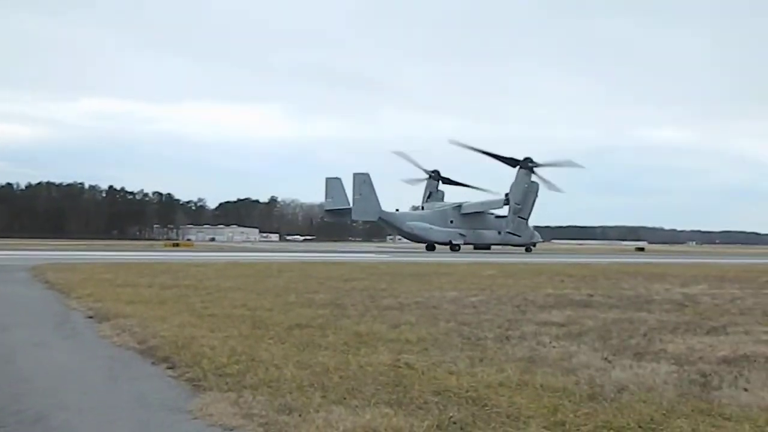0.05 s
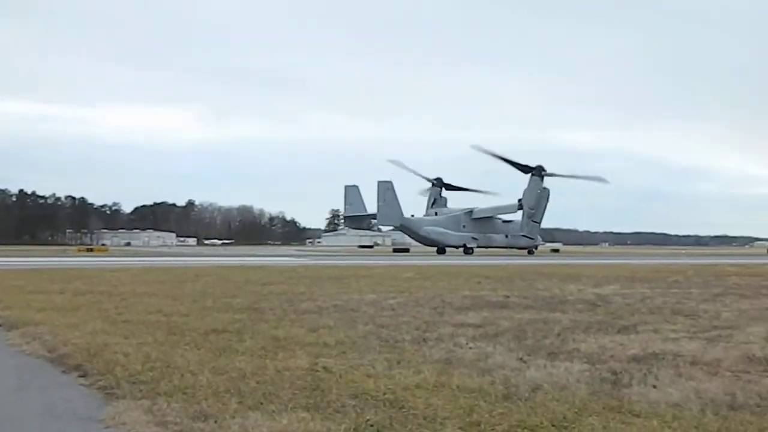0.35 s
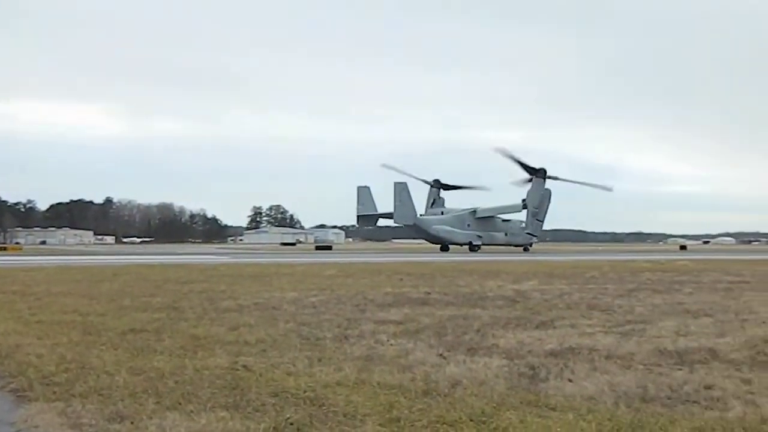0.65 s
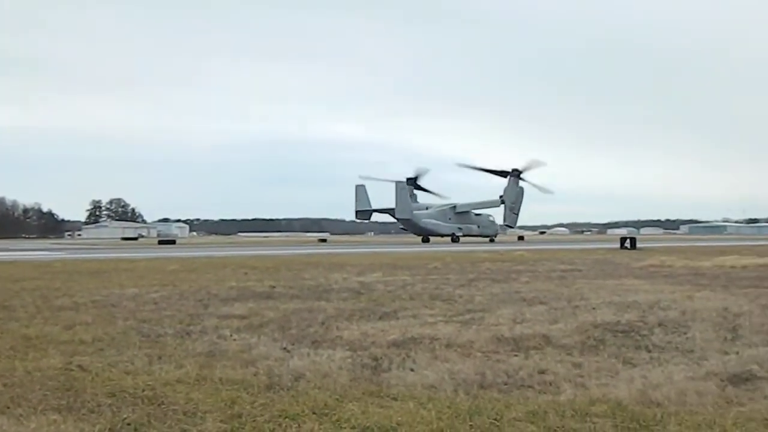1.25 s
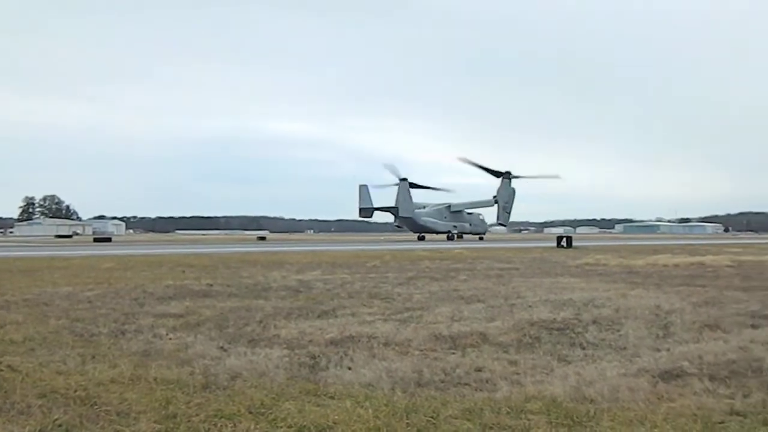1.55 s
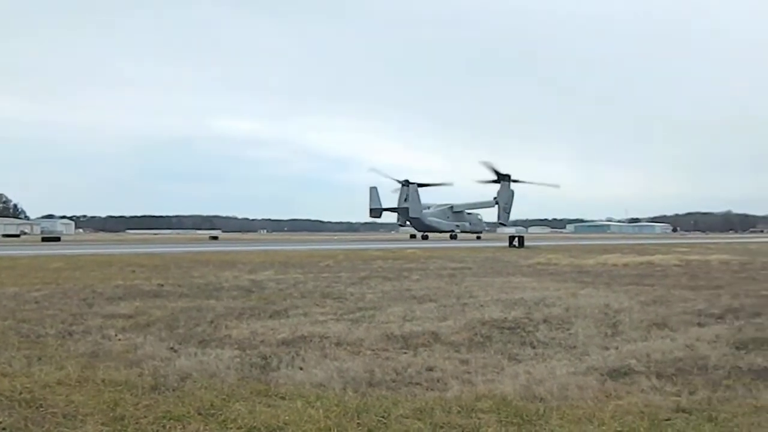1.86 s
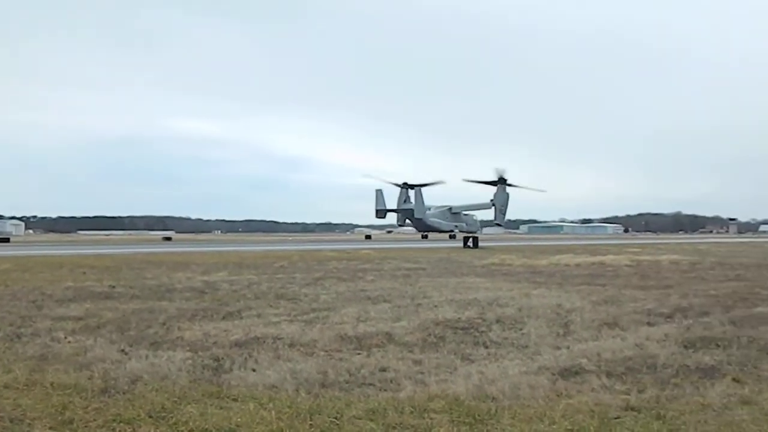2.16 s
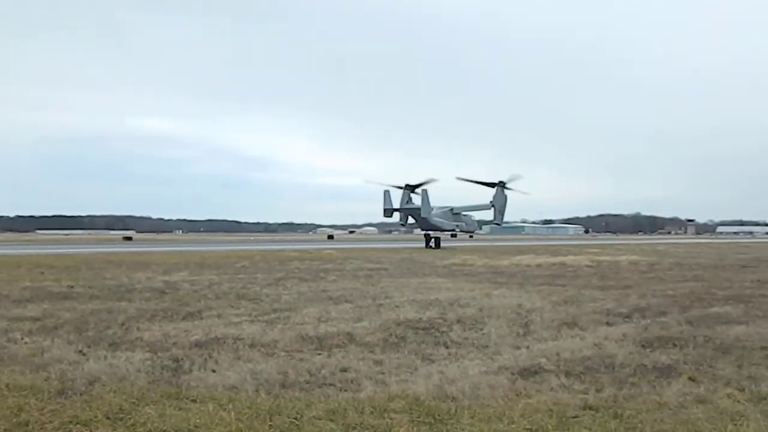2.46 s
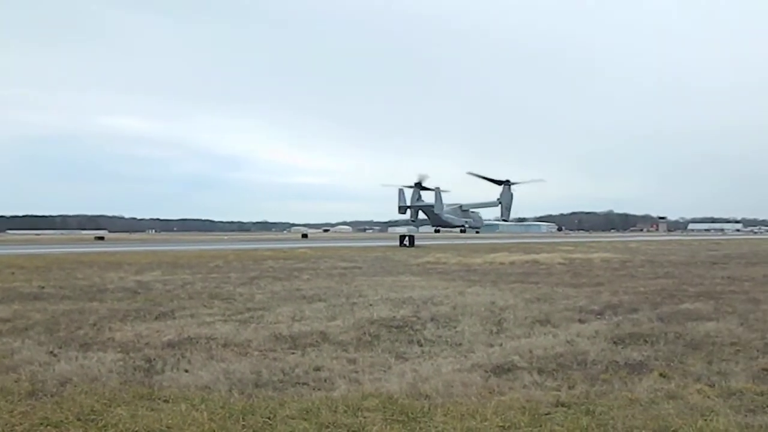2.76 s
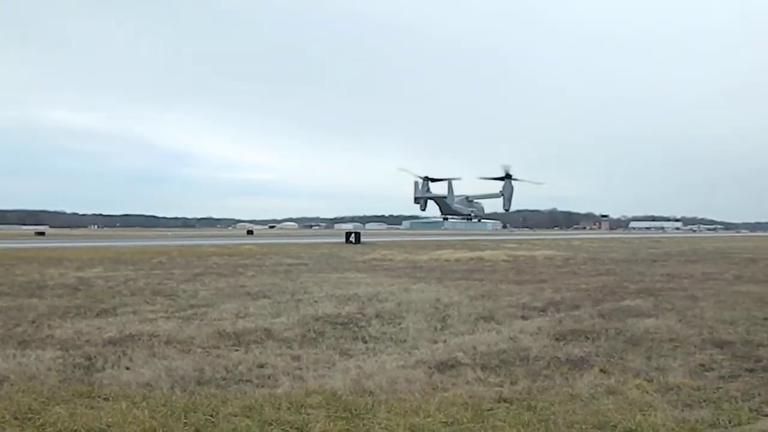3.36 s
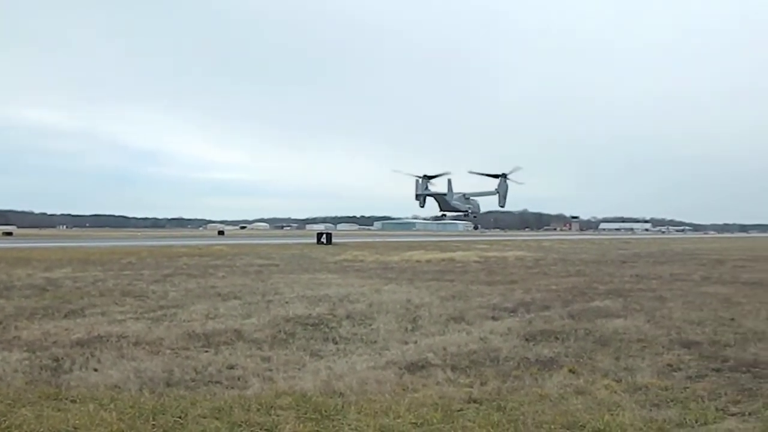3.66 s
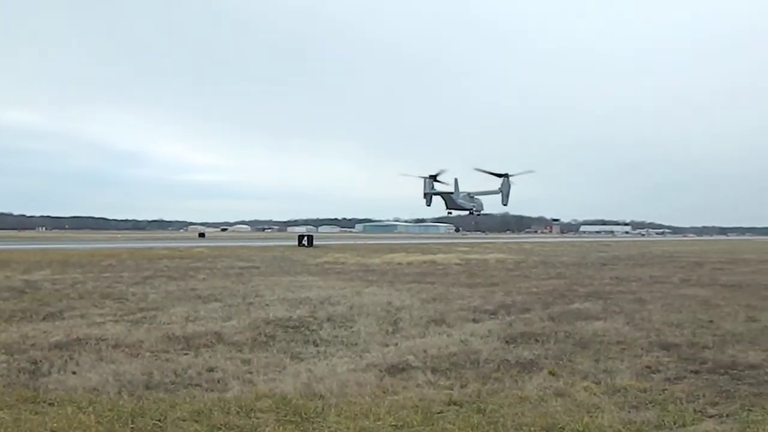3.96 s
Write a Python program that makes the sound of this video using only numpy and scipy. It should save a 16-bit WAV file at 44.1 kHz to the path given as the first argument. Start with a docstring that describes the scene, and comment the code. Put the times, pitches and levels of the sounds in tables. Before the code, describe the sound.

A tiltrotor aircraft roars with rapid thumping rotors, then grows duller as it moves away.

```python
"""A tiltrotor takes off

A tiltrotor aircraft rolls past on a runway, lifts off and moves away. Each passing blade throws
a low thump and a swish of torn air; the far rotor's thump trails the near one's until they merge.
Blades slap as they hit swirling air. Beneath them the engines and the downwash (air driven down)
roar, growing quieter and duller with distance. Turbines whine faintly; a few ticks sound close by."""
import sys
import numpy as np
from scipy import signal
from scipy.fft import rfft, irfft
from scipy.io import wavfile
from scipy.ndimage import uniform_filter1d

SR = 44100
rng = np.random.default_rng(int(sys.argv[2]) if len(sys.argv) > 2 else 0)


def inscribe(sig):
    """Save sig as 16-bit PCM at rate SR to the path in sys.argv[1].

    A 1-D sig is mono; a 2-D sig holds one channel per row.
    Samples are clipped to [-1, 1] before scaling.
    """
    pcm = np.round(np.clip(np.atleast_2d(sig).T, -1, 1) * 32767)
    wavfile.write(sys.argv[1], SR, pcm.astype(np.int16))


N = 4 * SR
T = np.arange(N) / SR
HZ = np.maximum(np.fft.rfftfreq(N, 1 / SR), 1)

# how often a blade passes: t/s, rate/Hz
BLADE_RATE = [(0, 19.52), (1, 19.59), (1.6, 19.47), (2.05, 19.52), (2.3, 19.08), (2.7, 19.14),
              (3.05, 19.54), (3.3, 19.08), (3.55, 19.39), (4, 19.15)]
# how far the far rotor trails the near one: t/s, delay/s
FAR_ROTOR_LAG = [(0, .023), (.5, .0175), (1.3, .0155), (1.5, .0138), (1.68, .0102), (1.87, .0068),
                 (1.95, .001), (4, .001)]
# loudness of the roar in three ranges: t/s, middle/dB, upper/dB, treble/dB
ROAR_LEVELS = [(0.04, -21, -22.5, -31), (0.25, -23.5, -22.5, -32), (0.45, -21.5, -20.5, -28),
               (0.6, -21.5, -21, -29.5), (0.78, -21.5, -20.7, -27), (1.0, -21.5, -21.5, -30),
               (1.35, -20, -22, -31.5), (1.65, -23.5, -24.5, -34), (1.8, -26, -23.5, -33),
               (2.25, -25.5, -25.5, -35), (2.55, -30.5, -28, -37.5), (2.76, -27.5, -29.5, -39.5),
               (2.79, -35, -32.5, -44.5), (2.9, -32.5, -31.5, -43.5), (3.08, -38, -35.5, -47.5),
               (3.2, -34, -31.5, -45.5), (3.3, -38, -33.5, -48.5), (3.55, -35, -31.5, -46.5),
               (3.8, -31, -28, -42.5), (3.97, -30, -29, -46)]
# tone of the roar within those ranges: f/Hz, relative level/dB
ROAR_SPECTRUM = [(300, -5.5), (400, -8.5), (500, -6), (660, 1), (826, 1), (1040, -7), (1300, -4),
                 (1630, -10.5), (1850, -5.5), (2400, -10), (2770, -11), (3250, -17), (4000, -21),
                 (5000, -22), (5700, -22), (6800, -28.5), (7800, -30), (9000, -36.5), (11800, -44),
                 (13400, -52), (15500, -63)]
# the very top of the roar fades with distance: t/s, gain/dB
TOP_GAIN = [(0, 3), (1.5, 3), (2.6, 1.5), (3.1, -2.5), (4, -9)]
# how late the echo off the ground comes: t/s, delay/s
ECHO_DELAY = [(0, .00136), (2, .00143), (4, .0015)]
# strength of that echo: f/Hz, gain/dB
ECHO_SPECTRUM = [(700, -12), (1600, -35), (2400, -33), (4000, -13), (9000, -5.5), (14000, -18)]
# loudness of the downwash: t/s, level/dB
WASH_LEVEL = [(0, -20.5), (.25, -21.5), (.45, -17.5), (1.1, -18.5), (1.4, -15.5), (1.8, -20.5),
              (2.05, -17.5), (2.4, -23.5), (2.8, -24.5), (3.3, -27), (3.75, -24), (4, -21.5)]
# tone of the downwash: f/Hz, relative level/dB
WASH_SPECTRUM = [(20, -31), (40, -33), (62, 3), (90, 3), (140, 2.5), (210, 1), (265, -2.5), (330, -14),
                 (420, -16.5), (600, -59)]
# the upper part of the downwash fades with distance: t/s, gain/dB
WASH_UPPER_GAIN = [(0, 6), (1.4, -1), (2.4, -3.5), (2.9, -9), (3.3, -9.5), (4, -9.5)]
# loudness of the turbines: t/s, level/dB
WHINE_LEVEL = [(0, -54), (2, -45.5), (3, -53), (4, -51)]
# where the turbines ring: f/Hz, width/Hz, relative level/dB
WHINE_RESONANCES = [(4250, 200, -2.5), (4655, 190, 2.5)]
# the roar swells with each blade: t/s, swell/dB, lead before the thump/s
SWISH_SWELL = [(0, 7.5, 0.00044), (.5, 4, 0.00046), (.9, 7, 0.0023), (1.2, 3.5, 0.00087), (1.7, -1, 0.0074),
               (2.3, 0, 0), (2.75, 0, 0.011), (3.0, 0.5, 0.00018), (3.25, 4.5, 0), (3.55, 1.5, 0),
               (4, -0.5, 0.014)]
# the middle range flares before each thump: t/s, flare/dB, lead/s
RASP_FLARE = [(0, 8.5, 0.013), (1.2, -1.5, 0.017), (1.7, 6, 0.0077), (2.1, 0, 0.0079), (2.35, 3.5, 0.01),
              (2.75, 8, 0.01), (3.0, 8.5, 0.0061), (3.2, 3, 0.0067), (4, 2, .01)]
# blade slaps: t/s, level against the roar/dB, half length/s, extra treble/dB, crack strength/0-1
BLADE_SLAPS = [(0.038, -21, 0.0025, -5, .5), (0.084, -7, 0.0032, -13, .6), (.301, -22, 0.0015, -5, 0.4),
               (0.352, -4, 0.0023, 4, 0.8), (.401, -3.5, 0.002, 3, 0.6), (.451, -14, 0.0017, 0, 0.6),
               (0.501, 2.5, 0.0041, -4, 0.9), (0.556, -16, .002, 6, 0.3), (0.657, -9, 0.0022, 5, 0.8),
               (.673, -6, .002, 6, 0.3), (0.707, 1, 0.0023, -2, 0.7), (0.765, -11, .002, 0, 0.5),
               (.81, -14, .003, 0, 0.6), (.825, -8, 0.0011, 7, 0.7), (0.87, -19, 0.0018, -4, 0.5),
               (0.98, -6, 0.0022, 3, 0.6), (1.108, -2, .002, 6, 0.9), (1.364, -14, 0.0027, -1, 0),
               (1.645, 1, 0.0025, -4, 0.1), (1.68, -0.5, 0.0059, -4, 0.1), (2.238, -3, 0.003, -9, 0),
               (2.337, -12, 0.0047, -10, 0.3), (2.487, -2, .003, -10, .2), (2.591, 1.5, 0.0049, -9, 0),
               (2.766, 1, .003, -8, .2), (2.916, -8, 0.007, -6, 0.1), (3.023, -2, 0.0072, -8, 0.1),
               (3.187, 1, .005, -16, 0.2), (3.23, -4, 0.0034, -7, .3), (3.338, -0.5, .004, -9, 0.3),
               (3.386, -4, 0.0027, -5, 0.4), (3.442, -5, 0.0025, -4, .5)]
# regular thumps: t/s, near rotor/dB, far rotor/dB, f/Hz, knock against the thump/dB
BLADE_THUMPS = [(0, -10.5, -15, 97, -15), (.5, -17.5, -14, 96, -12), (1.1, -14, -22.5, 101, -30),
                (1.45, -17.5, -9, 109, -12), (1.62, -24, -10.5, 105, -19), (1.85, -25, -12.5, 114, -12),
                (2.1, -11, -8, 112, -28), (2.5, -5.5, -24, 96.7, 1.5), (2.9, -6.5, -20, 103, -7),
                (3.15, -8.5, -28, 90.4, -6.5), (3.32, -10, -29, 100, -10), (3.6, -8, -27, 84, -10),
                (4, -11, -22, 86, -9)]
# single heavier blows: t/s, level/dB, f/Hz, knock against the blow/dB
HEAVY_THUMPS = [(.4, -12, 145, -7), (1.324, -11, 125, -14), (1.536, -17, 141, -14),
                (1.6914, -5.5, 142, -16), (1.7955, -17, 136, -14), (2.195, -23, 130, -14),
                (2.774, -14.5, 200, -5), (2.928, -15.5, 190, 4), (3.028, -16, 140, 12),
                (2.876, -15, 199, -9), (3.08, -20, 210, -10), (3.132, -17, 210, -6), (3.234, -14, 136, 8.5),
                (3.392, -10, 145, 0), (3.445, -15, 135, -3), (3.805, -10.5, 167, -3)]
# near blades that pass more softly: t/s, gain/dB
SOFT_THUMPS = [(2.3, -0.5), (2.615, -4.5), (2.98, -1), (3.183, -0.5), (3.288, -2.5), (3.547, -2)]
# thin ticks close by: t/s, level/dB, fading time/s
CLOSE_TICKS = [(2.0825, -28, .0004), (2.9097, -45, .0004), (3.029, -43, .0002), (3.236, -45, .0002),
               (3.9042, -39, .00017)]
# width and position of the sound: f/Hz, side gain/dB, left minus right/dB
STEREO_IMAGE = [(25, -15, -10), (70, -17, 2.5), (140, -17, 2.5), (480, -23, 3), (950, -18, 3),
                (1900, -17, 2.5), (3900, -12, 1.5), (8100, -5.5, 4), (13100, -6.5, -2.5)]
# the aircraft moves toward the centre: t/s, extra left minus right/dB
PAN_SHIFT = [(0, 0), (1.8, 0), (2.4, 0), (4, -0.3)]

ROAR_EDGES_HZ = (300, 1050, 3300, 17000)  # borders of the middle, upper and treble ranges


def from_db(db):
    """Turn decibels into a factor to multiply by."""
    return 10 ** (np.asarray(db) / 20)


def rms_one(x):
    """Scale a sound to an average power of 1."""
    return x / np.sqrt(np.mean(x ** 2) + 1e-20)


def even_power(gain):
    """Keep the average power of a pulsing gain near 1 over about three blades."""
    return gain / np.sqrt(uniform_filter1d(gain ** 2, size=6800))


def bell(x, width):
    """A smooth bump of height 1 around x = 0."""
    return np.exp(-.5 * np.minimum((x / width) ** 2, 50))


def in_time(rows, at=T):
    """Read each column of a time table at the given times."""
    times, *columns = np.transpose(rows)
    return [np.interp(at, times, column) for column in columns]


def over_hz(rows):
    """Read each column of a frequency table at every frequency."""
    hz, *columns = np.transpose(rows)
    return [np.interp(np.log(HZ), np.log(hz), column) for column in columns]


def colour(x, gain):
    """Filter a sound with one gain for each frequency."""
    return irfft(rfft(x) * gain, N)


def below(hz, steepness):
    """Filter gains that keep what lies below hz; 1 minus this keeps what lies above."""
    return 1 / (1 + (HZ / hz) ** steepness)


def drift(hz):
    """A random wobble of size about 1, mostly slower than hz."""
    return rms_one(colour(rng.standard_normal(N), below(hz, 2)))


def blade_count(first_blade_s=.045):
    """Count the passing blades; the near rotor thumps at each whole number."""
    count = np.cumsum(in_time(BLADE_RATE)[0]) / SR
    return count - np.interp(first_blade_s, T, count)


def crackle(pulsing, base_per_s=220, bunching=2.7):
    """Tiny random shocks in the air that crowd into the swells of the roar."""
    happens = rng.random(N) < base_per_s * pulsing ** bunching / SR
    return rms_one(happens * rng.choice([-1, 1], N))


def roar(pulsing, rasping, crackle_db=-11.5, flutter_db=.94, hiss_hz=7100, top_hz=9300):
    """Engines and torn air: crackling noise in three ranges that pulses with the blades."""
    shocks = from_db(crackle_db) * crackle(pulsing)
    bites, treble_bites, cracks = slaps()
    air = rng.standard_normal((2, N))  # mid (shared by both ears) and side (for width)
    air[0] = rms_one(air[0] + shocks) + cracks
    tone = from_db(over_hz(ROAR_SPECTRUM)[0])
    flutter = from_db(flutter_db * drift(hz=63.5))
    surges = (pulsing * rasping + bites,  # middle
              pulsing * rasping ** .17 + bites,  # upper: only a little rasp
              pulsing + treble_bites)
    steady = out = 0
    for low, high, db, surge in zip(ROAR_EDGES_HZ, ROAR_EDGES_HZ[1:], in_time(ROAR_LEVELS), surges):
        band = rms_one(colour(air, tone * (HZ >= low) * (HZ < high))) * from_db(db)
        steady = steady + band
        out = out + band * surge * flutter
    out = out + colour(steady - out, .4 * (1 - below(hiss_hz, 10)))  # the high hiss pulses less
    top = colour(out, 1 - below(top_hz, 12))
    return out + top * (from_db(in_time(TOP_GAIN)[0]) - 1)


def ground_echo(sound):
    """Add the bounce off the ground, whose delay slowly grows as the aircraft climbs."""
    echo = colour(sound, from_db(over_hz(ECHO_SPECTRUM)[0]))
    earlier = T - in_time(ECHO_DELAY)[0]
    return sound + [np.interp(earlier, T, channel) for channel in echo]


def downwash(pulsing, split_hz=237, flutter_db=1):
    """Air driven onto the runway makes a low, lumpy rumble that pulses gently with the blades."""
    rumble = rms_one(colour(rng.standard_normal((2, N)), from_db(over_hz(WASH_SPECTRUM)[0])))
    lower = colour(rumble, below(split_hz, 8))
    upper = (rumble - lower) * from_db(in_time(WASH_UPPER_GAIN)[0])
    level_db = in_time(WASH_LEVEL)[0] + flutter_db * drift(hz=31)
    return (lower + upper) * pulsing ** .36 * from_db(level_db)


def turbines():
    """A faint, airy whine: noise ringing at two high pitches."""
    peaks = sum(from_db(db) / (1 + (2 * (HZ - hz) / width) ** 2) for hz, width, db in WHINE_RESONANCES)
    return rms_one(colour(rng.standard_normal((2, N)), peaks)) * from_db(in_time(WHINE_LEVEL)[0])


def rasp(count, width_blades=.082):
    """A gain that makes the roar flare just ahead of each thump."""
    flare_db, lead = in_time(RASP_FLARE)
    position = count + lead * in_time(BLADE_RATE)[0]
    flare = bell(position - np.round(position), width_blades)
    return even_power(from_db(flare_db * flare))


def slaps(crack_db=20.5):
    """A blade bites into the swirl from a blade tip: brief gains for the roar, and one sharp shock."""
    bites, treble_bites, cracks = np.zeros((3, N))
    for start, db, half_length, treble_db, crack in BLADE_SLAPS:
        bite = from_db(db) * bell(T - start, half_length)
        bites += bite
        treble_bites += bite * from_db(treble_db)
        cracks[int(start * SR)] = crack * from_db(crack_db)
    return bites, treble_bites, cracks


def swish(count, width_blades=.11, scatter=.14, far_share=.36):
    """A gain that swells as each blade of either rotor sweeps by and tears the air."""
    swell_db, lead = in_time(SWISH_SWELL)
    surge = 0
    for share, delay in ((1, 0), (far_share, in_time(FAR_ROTOR_LAG)[0])):
        position = count + (lead - delay) * in_time(BLADE_RATE)[0]
        blade = np.round(position).astype(int)
        strength = 1 + scatter * rng.standard_normal(128)
        surge = surge + share * strength[blade] * bell(position - blade, width_blades)
    return even_power(from_db(swell_db * surge))


def thump(at, db, hz, skew=0, width_cycles=.54, suction_s=.02):
    """One blade's pressure wave: a sharp dip between two crests; skew makes one crest steeper."""
    out = np.zeros(N)
    span = slice(max(int(at * SR) - SR // 25, 0), int(at * SR) + SR // 25)
    t = T[span] - at
    cycles = t * hz
    wave = np.cos(2 * np.pi * (cycles + skew * cycles ** 2)) * bell(cycles, width_cycles)
    broad_dip = .26 * bell(t, suction_s)
    out[span] = -from_db(db) * (wave + broad_dip)
    return out


def knock(at, db, length_s=.00096, rounding_s=.00029):
    """A thump's hard edge: the slightly rounded spike at the bottom of its pressure dip."""
    out = np.zeros(N)
    span = slice(max(int(at * SR) - SR // 50, 0), int(at * SR) + SR // 50)
    away = np.hypot(T[span] - at, rounding_s) / length_s
    out[span] = -from_db(db) * (1 - away) * np.exp(-away)
    return out


def rotors(count, jitter_s=.00066, scatter_db=.56, pitch_scatter=.055, knock_scatter_db=3.5):
    """Both rotors thump and knock once per blade, never quite the same way twice."""
    near_times = np.interp(np.arange(np.floor(count[-1]) + 1), count, T)
    far_times = near_times + in_time(FAR_ROTOR_LAG, near_times)[0]
    near_db, far_db, pitches, knocks = in_time(BLADE_THUMPS, near_times)
    near_db += sum(db * (np.abs(near_times - at) < .012) for at, db in SOFT_THUMPS)
    out = np.zeros(N)
    for times, levels in ((near_times, near_db), (far_times, far_db)):
        for at, db, hz, knock_db in zip(times, levels, pitches, knocks):
            late, loud, high, hard, lean = rng.standard_normal(5)
            at += jitter_s * late
            db += scatter_db * loud
            out += thump(at, db, hz * np.exp(pitch_scatter * high), skew=.17 * lean)
            out += knock(at, db + knock_db + knock_scatter_db * min(hard, 1))
    return out


def heavy_thumps():
    """Single heavier blows among the regular thumps."""
    return sum(thump(at, db, hz) + knock(at, db + knock_db) for at, db, hz, knock_db in HEAVY_THUMPS)


def ticks(hz=12500):
    """Tiny, high clicks that ring for a few cycles."""
    out = np.zeros(N)
    for start, db, fade_s in CLOSE_TICKS:
        age = np.maximum(T - start, 0)
        out += from_db(db) * np.sin(2 * np.pi * hz * age) * np.exp(-np.minimum(age / fade_s, 50))
    return out


def spread(mid, side):
    """Turn mid and side into left and right: slightly to the left, and wider in the treble."""
    side_db, left_db = over_hz(STEREO_IMAGE)
    side = colour(side, from_db(side_db))
    left = colour(mid, from_db(left_db / 2)) + side
    right = colour(mid, from_db(-left_db / 2)) - side
    return np.array([left, right])


def scene():
    """Roar, downwash, whine and thumps across an open field; a few thin ticks close by."""
    count = blade_count()
    pulsing = swish(count)
    mid, side = ground_echo(roar(pulsing, rasp(count))) + downwash(pulsing) + turbines()
    aircraft = spread(mid + rotors(count) + heavy_thumps(), side)
    pan = from_db(in_time(PAN_SHIFT)[0] * [[.5], [-.5]])
    return aircraft * pan + ticks()


def record(dry, low_cut_hz=6.8, ceiling=.95, high_cut_hz=16000):
    """Remove the deepest bass, round off the peaks and cut the highest treble."""
    sound = colour(dry, 1 - below(low_cut_hz, 4))
    rounded = sound / (1 + np.abs(sound / ceiling) ** 3) ** (1 / 3)
    return signal.sosfilt(signal.cheby2(16, 70, high_cut_hz, fs=SR, output="sos"), rounded)


dry = scene()
out = record(dry)
inscribe(out)
```